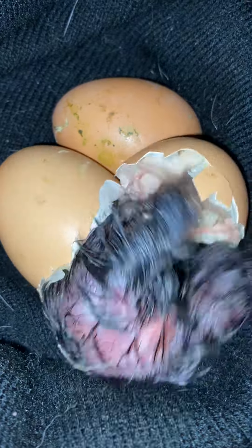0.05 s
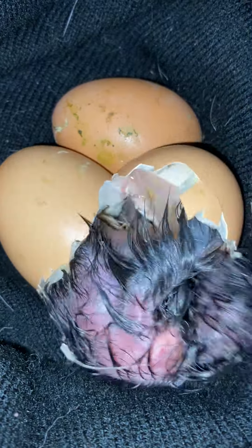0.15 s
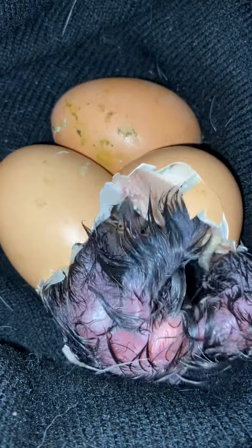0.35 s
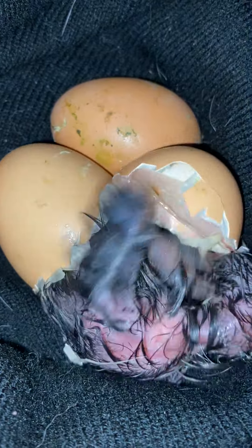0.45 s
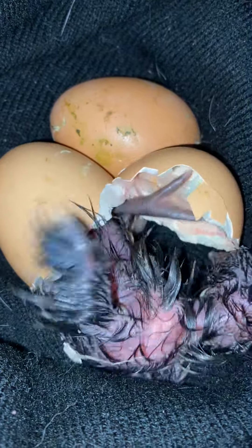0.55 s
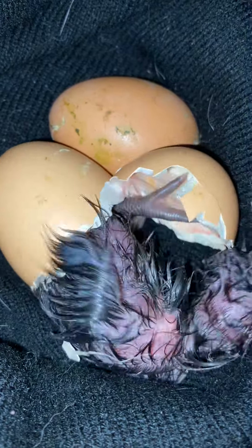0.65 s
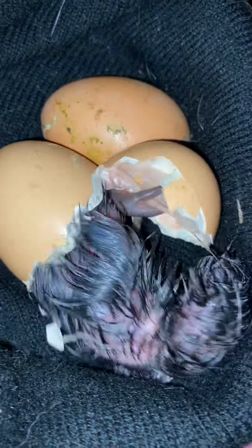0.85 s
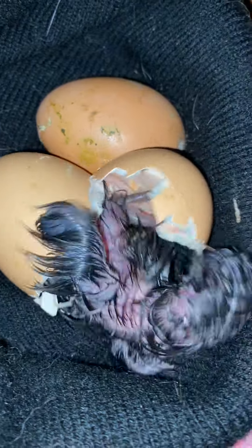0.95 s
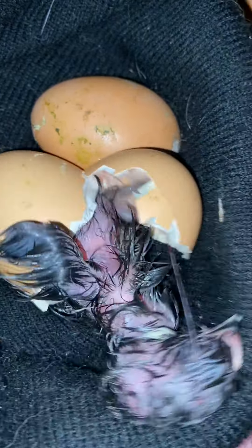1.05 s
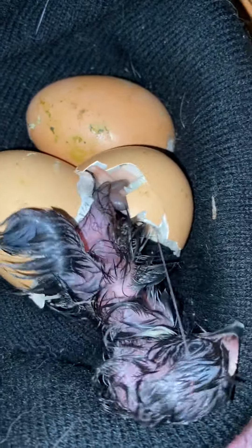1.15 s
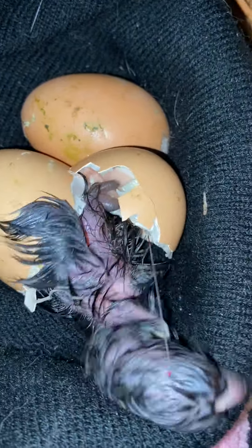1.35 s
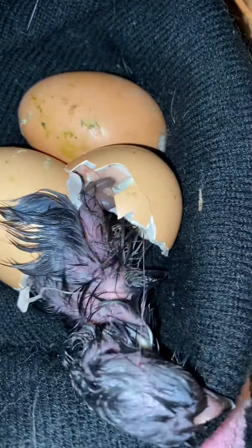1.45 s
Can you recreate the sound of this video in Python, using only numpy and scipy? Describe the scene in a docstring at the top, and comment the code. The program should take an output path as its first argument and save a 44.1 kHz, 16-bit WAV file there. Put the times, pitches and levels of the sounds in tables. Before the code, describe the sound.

Close to the microphone in a quiet room, a hatchling chick peeps twice, first loud and falling, then brief and weaker. In between come faint shell cracks, light scrapes and the soft bumps of its body on cloth.

```python
"""In a quiet room, a newly hatched chick peeps twice, close by. Its voice box (the syrinx) has two
sides, which sound alone or together; together they make a fast throb called beating. Between peeps
the chick struggles on cloth: the broken shell ticks and scrapes against the eggs, and its body
bumps softly. The room adds a faint echo and a low rumble."""
import sys
import numpy as np
from scipy import signal
from scipy.fft import rfft, irfft
from scipy.io import wavfile
from scipy.ndimage import uniform_filter1d

SR = 44100
rng = np.random.default_rng(int(sys.argv[2]) if len(sys.argv) > 2 else 0)


def unload_wav(signal):
    """Save mono or channel-first audio to the path in sys.argv[1] as 16-bit WAV at rate SR, clipped to [-1, 1]."""
    wavfile.write(
        sys.argv[1],
        SR,
        np.round(np.clip(np.atleast_2d(signal).T, -1, 1) * 32767).astype(np.int16),
    )


N = 66150

# The low and high side of the voice box in each peep
# (t/s, f/Hz, level/dB, first overtone against the main tone/dB, left over right/dB)
LONG_LOW = [(.198, 4037, -60, -12, 2.5), (.212, 4130, -43, -14.5, 5), (.229, 4200, -40, -19, 1.5),
            (.236, 4002, -44, -11, -0.5), (.28, 3994, -36, -4.5, 0.5), (.296, 4022, -32.5, -4, -1),
            (.2995, 4099, -42.5, -10.5, 0.5), (.303, 4110, -30, -9.5, 3), (.319, 3893, -24, -20, 1.5),
            (.324, 3363, -17.5, -23, 7), (.329, 3364, -13.5, -30.5, 4.5), (.336, 3061, -14, -16.5, -4),
            (.349, 2849, -25.5, -7, 1), (.358, 2450, -42, 7.5, -5), (.366, 1980, -52.5, -5, -2)]
LONG_HIGH = [(0.232, 4251, -38, -15, 2), (0.254, 4370, -32.5, -12, 2), (0.262, 4420, -30, -11.5, 2),
             (.28, 4430, -32, -13, 2), (0.292, 4364, -36.5, -20.5, 3), (.296, 4447, -31.5, -19.5, 3),
             (0.2991, 4127, -48, -20, 3), (0.304, 4250, -30, -20, 3), (.306, 4250, -44, -21, 3)]
SHORT_LOW = [(1.163, 1960, -45, -3.5, -1), (1.168, 2225, -39.5, -2, -4), (1.175, 2502, -37, -3, -17.5),
             (1.182, 2580, -31.5, -7, -3.5), (1.187, 2819, -31.5, -35, -7), (1.2, 3003, -54.5, -25, 16)]
SHORT_HIGH = [(1.186, 4150, -50.5, -15, 15), (1.19, 4300, -49, -44, 3), (1.198, 4400, -38, -33, -24),
              (1.2011, 3580, -30.5, -12.5, 11), (1.204, 3790, -33.5, -20, 12),
              (1.213, 3860, -33.5, -24.5, 8), (1.222, 3620, -37.5, -6.5, 4), (1.23, 3270, -38.5, -11, 0),
              (1.236, 2300, -41.5, -20.5, -9)]
def peeps():
    """The chick pushes air through its voice box: one long peep, then a short one."""
    long_peep = voice_box(LONG_LOW, LONG_HIGH, overtone_step_db=-18.5)
    return long_peep + voice_box(SHORT_LOW, SHORT_HIGH, overtone_step_db=-10.5)


# Extra tones appear as the wave repeats only every few cycles (start/s, end/s, cycles, level/dB)
PITCH_SPLITS = [(.199, .208, 3, -3), (.207, .222, 2, -3), (.221, .229, 3, -16)]
# The voice turns hoarse (start/s, end/s, rasp level/dB)
HOARSE_SPELLS = [(.198, .209, -8), (.209, .245, -24), (.245, .29, -25), (.29, .305, -14),
                 (1.163, 1.184, -18), (1.184, 1.201, -11), (1.201, 1.235, -25)]
# Tone colour (which pitches are strong) of the rasp, and of throat and beak (f/Hz, level/dB)
RASP_COLOUR = [(1500, -40.5), (2700, -21.5), (3600, -5.5), (4600, -6), (6000, -15), (8500, -19),
               (12000, -24), (16000, -32.5)]
THROAT_COLOUR = [(1000, -6.5), (2000, 2.5), (4000, 0), (6000, 1), (7000, -0.5), (8300, -3), (10500, 1.5),
                 (12300, 2), (14000, -12.5), (16000, -9.5)]
def voice_box(low, high, overtone_step_db):
    """Both sides share one air stream, so they throb, bend each other and add a higher tone."""
    sides = voice_side(low, overtone_step_db), voice_side(high, overtone_step_db)
    (low_phase, low_size, _, _), (high_phase, high_size, _, _) = sides
    balance = 2 * low_size * high_size / (low_size ** 2 + high_size ** 2 + 1e-18)  # 1 if equally loud
    throb = 1 + .28 * balance * np.cos(high_phase - low_phase)
    bend = .96 * balance * np.sin(high_phase - low_phase)
    hoarseness = undb(-37) + sum(undb(db) * gate(start, end) for start, end, db in HOARSE_SPELLS)
    # The higher tone lies at the two frequencies added together.
    voice = undb(-15) * np.sqrt(low_size * high_size) * np.cos(low_phase + high_phase)
    for phase, size, ears, overtones in sides:
        split = sum(undb(db) * gate(start, end) * np.cos(phase * (1 + 1 / cycles))
                    for start, end, cycles, db in PITCH_SPLITS)
        split *= 1 + .44 * np.cos(phase)
        rasp = hoarseness * noise(RASP_COLOUR)
        voice = voice + size * throb * (ears * np.cos(phase + bend) + overtones + split + rasp)
    return np.sqrt(2) * colour(voice, THROAT_COLOUR)


def voice_side(curve, overtone_step_db):
    """One side vibrates a little unsteadily, with overtones at 2 to 6 times its frequency."""
    times, *columns = np.array(curve).T
    hz, db, overtone_db, left_db = (np.interp(np.arange(N) / SR, times, c) for c in columns)
    hz = hz * (1 + .0046 * wobble(450))
    phase = 2 * np.pi * np.cumsum(hz) / SR
    size = undb(db + .2 * wobble(160)) * gate(times[0], times[-1])
    ears = undb(np.array([left_db, -left_db]) / 2)
    ears = ears / np.sqrt(np.mean(ears ** 2, axis=0))
    overtones = sum(undb(overtone_db + overtone_step_db * (k - 2)) * np.cos(k * phase) * (k * hz < SR / 2)
                    for k in range(2, 7))
    return phase, size, ears, overtones


# Cracks in the shell (t/s, level/dB, dull part against bright part/dB)
SHELL_CRACKS = [(.1715, -58.5, 1), (.1855, -54, 5.5), (.472, -58, -3.5), (.479, -41.5, -10),
                (.499, -54, -24), (.527, -62, -12), (.566, -59.5, 5.5), (.5787, -33.5, -23),
                (.667, -64.5, -10.5), (.787, -52, -13.5), (.790, -53.5, -16.5), (.855, -49.5, 4),
                (.891, -51.5, -2), (.923, -55, 2), (.929, -40.5, -20), (.939, -59, -1), (1.0405, -52, 6.5),
                (1.149, -49.5, 7), (1.305, -61, 2), (1.401, -66, -16.5)]
# The bright and the dull part of a crack (f/Hz, level/dB)
CRACK_BRIGHT = [(1000, -33), (4000, -13), (5500, -1.5), (7200, -0.5), (9500, -2.5), (12000, -5),
                (14000, -3.5), (16000, -4)]
CRACK_DULL = [(300, -2.5), (1300, -6.5), (3000, 2.5), (5000, -6.5), (8000, -37), (16000, -44)]
def shell_ticks():
    """The brittle shell edge cracks: a sharp snap, then a short crumbling tail."""
    snap_s, tail_s = .0006, .004
    out = 0
    for start, db, dull_db in SHELL_CRACKS:
        age = since(start)
        fade = (age > 0) * (np.exp(-age / snap_s) + undb(-19) * np.exp(-age / tail_s))
        out = out + undb(db) * fade * (noise(CRACK_BRIGHT) + undb(dull_db) * noise(CRACK_DULL))
    return out


# The shell slips on an egg (t/s, level/dB, f/Hz)
SHELL_SLIPS = [(.002, -45, 1451), (0.9088, -34, 1098), (.912, -40.5, 1350), (0.919, -42, 1087),
               (.938, -45, 1450), (0.9462, -42.5, 1250), (.952, -48, 1310), (.9855, -44, 1420),
               (1.002, -40, 1400), (1.008, -39, 1254), (1.0128, -37, 1350), (1.0408, -42.5, 1055),
               (1.108, -49, 1250)]
def shell_slips():
    """Each slip makes the hollow shell ring briefly at two pitches."""
    return sum(undb(db) * (ring(start, hz, rise_s=.0016) + .32 * ring(start, hz * 1.3, rise_s=.0016))
               for start, db, hz in SHELL_SLIPS)


# The chick's pushes (t/s, length/s, shell rub/dB, cloth/dB, crackle/dB)
PUSHES = [(-.012, .028, -49, -48.5, -60), (0.162, 0.076, -73, -69, -64.5), (0.243, 0.052, -59, -58, -92),
          (0.462, 0.046, -61, -62, -63.5), (0.559, 0.029, -61, -49, -63.5), (0.644, 0.049, -67, -59, -74.5),
          (0.803, 0.041, -73.5, -72, -83.5), (0.842, 0.046, -62, -63, -72), (0.893, 0.03, -52.5, -60, -71),
          (0.911, 0.059, -55, -56.5, -65), (0.966, 0.068, -50, -62, -70.5),
          (1.064, 0.12, -61.5, -63.5, -71.5), (1.147, 0.032, -55.5, -54, -68),
          (1.156, 0.1, -67.5, -62.5, -63.5), (1.39, .14, -91, -70, -108.5)]
# Tone colour of rubbed shell and of cloth (f/Hz, level/dB)
RUB_COLOUR = [(200, -28.5), (500, -11.5), (800, -8), (1100, -3), (1250, -3), (1450, -1), (1650, -8),
              (1900, -15.5), (2300, -17.5), (4000, -27), (16000, -56)]
CLOTH_COLOUR = [(30, -8), (100, -2.5), (300, -1), (500, -5), (800, -13.5), (2000, -27), (16000, -57)]
def scuffles():
    """Each push swells and fades, sounding through the hollow shell, the cloth and the wet down."""
    out = 0
    for layer, curve in enumerate((RUB_COLOUR, CLOTH_COLOUR, CRACK_BRIGHT)):
        effort = sum(undb(levels[layer]) * np.sin(np.pi * np.minimum(since(start) / length, 1))
                     for start, length, *levels in PUSHES)
        out = out + effort * widen(friction(curve), friction(curve), side_db=-12.5)
    return out


def friction(curve, catches_per_s=1700, spread_db=5):
    """Rubbing surfaces catch and let go, making a dense stream of tiny clicks."""
    catches = (rng.random(N) < catches_per_s / SR) * rng.choice([-1, 1], N)
    return unit(colour(catches * undb(spread_db * rng.standard_normal(N)), curve))


# The chick's body bumps down (t/s, level/dB, f/Hz)
BODY_BUMPS = [(.001, -48.5, 118.7), (0.176, -52, 135), (.272, -55, 170), (0.587, -48, 120),
              (.68, -59.5, 65), (0.937, -52, 70), (.949, -48.5, 128.3), (1.045, -44, 270),
              (1.1, -51.5, 49.9), (1.122, -51.5, 110), (1.165, -53, 142), (1.204, -52, 60)]
def body_bumps():
    """The soft body lands on the cloth with low thuds."""
    return sum(undb(db) * ring(start, hz, rise_s=.7 / hz) for start, db, hz in BODY_BUMPS)


def room_echo(sound, fade_s=.2, cutoff_hz=4000):
    """The room sends back a faint, dull echo, different in each ear."""
    tail = signal.sosfilt(signal.butter(2, cutoff_hz, fs=SR, output="sos"), rng.standard_normal((2, N)))
    tail = tail * np.exp(-np.log(1000) * since(0) / fade_s)  # 60 dB down after fade_s
    tail = tail / np.sqrt(np.sum(tail ** 2) / 2)
    return undb(-37) * signal.fftconvolve(sound, tail, axes=1)[:, :N] / 2


# Tone colour of the rumble: what both ears share, and what differs between them (f/Hz, level/dB)
RUMBLE_SHARED = [(20, -11), (45, 2.5), (65, 0.5), (90, -8), (130, -7.5), (200, -14.5), (400, -21.5),
                 (800, -32), (1400, -31), (2200, -37.5), (3000, -40), (5500, -39.5), (7300, -48.5),
                 (9000, -41.5), (11500, -42), (13500, -51), (16000, -52)]
RUMBLE_SIDE = [(30, -2), (200, -6), (700, -12), (1500, -17), (2800, -13), (4500, -22), (16000, -35)]
def room_rumble():
    """A quiet, low rumble whose loudness flutters a little."""
    shared = noise(RUMBLE_SHARED) * undb(1.5 * wobble(35))
    return undb(-65) * widen(shared, noise(RUMBLE_SIDE), side_db=-17)


def undb(db):
    """Turn decibels into a number to multiply by."""
    return 10 ** (np.asarray(db) / 20)


def unit(x):
    """Scale to an average strength (rms) of 1."""
    return x / np.sqrt(np.mean(x ** 2))


def colour(x, curve):
    """Turn lows and highs up or down along a curve (f/Hz, level/dB)."""
    hz, db = np.array(curve, float).T
    f = np.fft.rfftfreq(2 * N, 1 / SR)
    gain = undb(np.interp(np.log(f + 1), np.log(hz + 1), db))
    return irfft(rfft(x, 2 * N) * gain)[..., :N]


def noise(curve):
    """Noise of strength 1 with the given tone colour."""
    return unit(colour(rng.standard_normal(N), curve))


def wobble(turns_per_s):
    """Glide from one random value to the next, with strength 1."""
    hold = max(int(SR / turns_per_s), 1)
    steps = np.repeat(rng.standard_normal(N)[:N // hold + 1], hold)[:N]
    return unit(uniform_filter1d(steps, hold))


def gate(start, end, fade_s=.003):
    """Fade in around the start and out around the end."""
    t = np.arange(N) / SR
    return np.sin(np.pi / 2 * np.clip(np.minimum(t - start, end - t) / fade_s + .5, 0, 1)) ** 2


def since(start):
    """Seconds since a moment, zero before it."""
    return np.maximum(np.arange(N) / SR - start, 0)


def ring(start, hz, rise_s):
    """A softly pushed object rings: its tone swells, then dies away."""
    age = since(start)
    return age / rise_s * np.exp(1 - age / rise_s) * np.sin(2 * np.pi * hz * age)


def widen(shared, side, side_db):
    """Make a sound wide: add a side signal on the left and subtract it on the right."""
    return shared + undb(side_db) * side * np.array([[1], [-1]])


def scene():
    """Chick and shell over the low rumble of the room."""
    near = peeps() + shell_ticks() + shell_slips() + scuffles() + body_bumps()
    return near + room_echo(near) + room_rumble()


# How far the recorder's stereo processing shifts the left wave ahead of the right (f/Hz, shift/radians)
STEREO_SHIFT = [(0, -0.5), (1030, 1.4), (2150, -1.92), (2760, -2.5), (3450, -4.5), (5080, -5.5),
                (6980, -3.5), (8960, -1.34), (9730, -0.86), (11000, 0.84), (12700, 2), (14700, 3.5),
                (15700, 10), (16600, 0.5)]
def record(dry):
    """The recorder shifts left against right, differently at each pitch, and cuts the top treble."""
    top_hz = 16400
    hz, radians = np.array(STEREO_SHIFT).T
    shift = np.interp(np.fft.rfftfreq(2 * N, 1 / SR), hz, radians)
    pair = irfft(rfft(dry, 2 * N) * np.exp(1j * np.array([shift, -shift]) / 2))[:, :N]
    return signal.sosfilt(signal.ellip(10, .2, 80, top_hz, fs=SR, output="sos"), pair)


dry = scene()
out = record(dry)
unload_wav(out)
```